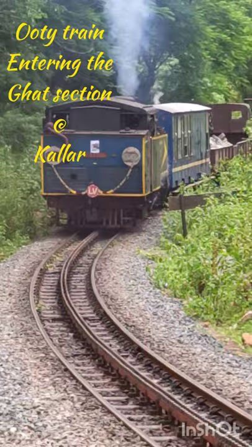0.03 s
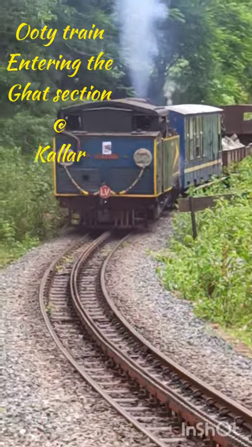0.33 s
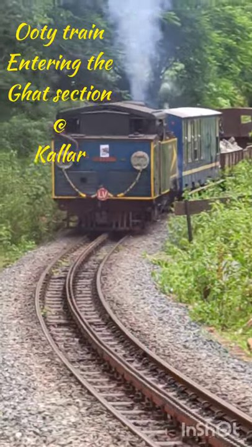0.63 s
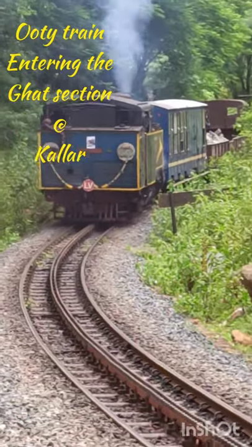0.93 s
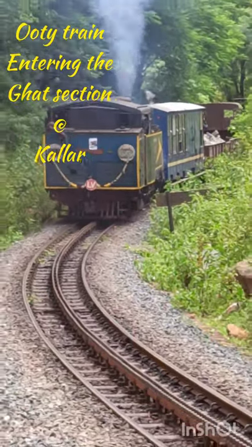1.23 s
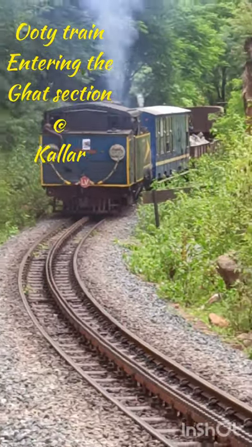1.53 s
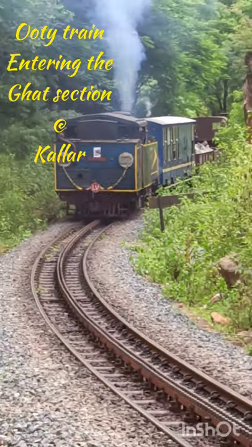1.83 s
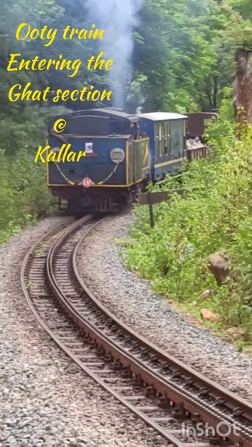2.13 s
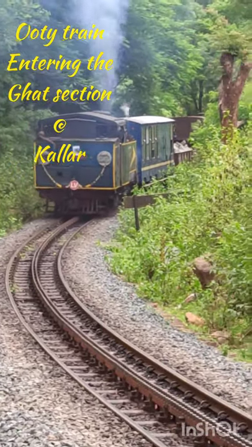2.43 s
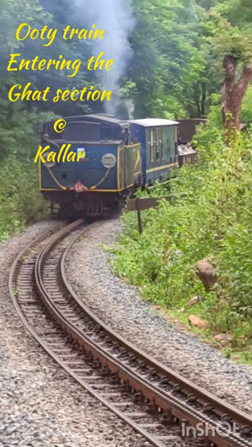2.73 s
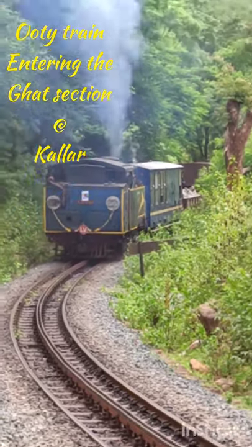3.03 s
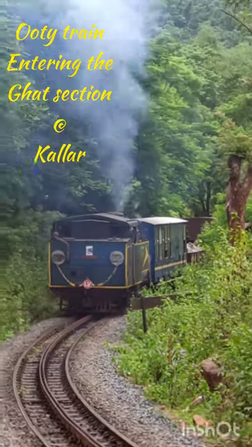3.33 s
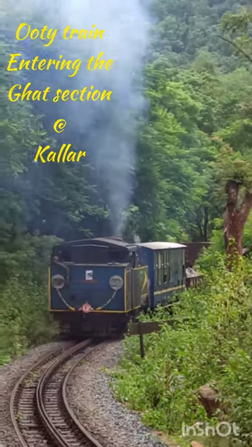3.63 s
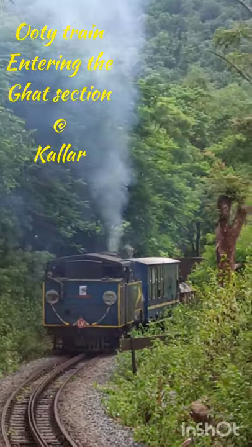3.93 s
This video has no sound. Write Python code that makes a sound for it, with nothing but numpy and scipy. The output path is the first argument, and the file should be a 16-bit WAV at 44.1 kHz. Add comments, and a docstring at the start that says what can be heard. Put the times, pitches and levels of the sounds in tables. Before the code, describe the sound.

A small steam locomotive chuffs through a forest, some way off. Rumbling wheels and leaking steam come in first, then quick, uneven chuffs and hissing jets with a few thin squeaks. The chuffs are strongest in the second half.

```python
"""A small steam locomotive works a train along a curved track in a forest, some way off.
First the engine's rumble, the rush of wheels on rails and a steady leak of steam fade in quickly.
From 0.3 s the chimney barks about six times a second, unevenly, and steam jets hiss from the cylinders
in a rhythm of their own. The trees give every blast a short tail; the running gear squeaks now and then.
The strongest barks come in the second half, and the engine is still working when the sound ends at 4 s."""
import sys
import numpy as np
from scipy import signal
from scipy.fft import rfft, irfft
from scipy.io import wavfile

SR = 44100
rng = np.random.default_rng(int(sys.argv[2]) if len(sys.argv) > 2 else 0)


def dump_mix(stems):
    """Bounce the given channels to the path in sys.argv[1] as a 16-bit WAV at rate SR."""
    frames = np.atleast_2d(stems).T  # one column per channel
    limited = np.clip(frames, -1, 1)  # hard clip at full scale
    pcm = np.round(limited * 32767).astype(np.int16)
    wavfile.write(sys.argv[1], SR, pcm)


N = 176400
TIME = np.arange(N) / SR


def chimney():
    """Each beat of used steam is a bark with a hollow pitch of its own, a low puff and a thump of air."""
    # (start [s], length [s], bark [dB], puff [dB], thump [dB], bark pitch [Hz], boost at that pitch [dB])
    beats = [(0.34, 0.035, -35.5, -44, -33.5, 600, 2), (0.420, 0.043, -36, -33.5, -32, 440, 5),
             (0.632, 0.07, -30.7, -31, -30, 530, 6), (0.790, 0.081, -28, -26.5, -31.5, 830, 5),
             (0.967, .065, -38, -35, -29.5, 660, 4), (1.102, 0.064, -35, -37, -34, 480, 0),
             (1.302, 0.05, -30.5, -28.3, -33.5, 490, 7), (1.474, .072, -39, -24.5, -28.3, 450, -2),
             (1.652, 0.041, -40, -48, -31.5, 580, 3), (1.803, 0.03, -33, -42, -47, 584, 14),
             (1.984, 0.08, -28.5, -41, -37, 530, 4), (2.073, .04, -31, -43, -44, 920, 5),
             (2.18, .068, -28.5, -31, -26, 580, 7), (2.334, 0.039, -37, -38, -30.5, 900, 10),
             (2.486, 0.069, -30.5, -34, -43, 400, 6), (2.689, 0.052, -23.2, -30, -39, 527, 11.5),
             (2.862, 0.04, -22.5, -31, -32, 542, 11.5), (2.998, 0.018, -49, -45, -48, 600, -3),
             (3.192, 0.036, -29.5, -38, -31.5, 520, 4), (3.373, 0.062, -27, -36, -37, 560, 3),
             (3.568, 0.047, -22.5, -27.5, -40, 535, 8), (3.7, 0.054, -29.5, -38.5, -30, 624, 8),
             (3.896, 0.061, -34, -43, -33, 560, 3)]
    # tone colours of the three parts: (frequency [Hz], level [dB])
    bark_colour = [(150, -28), (300, -7), (410, -2), (520, -1), (610, -2), (690, -5), (850, -3),
                   (1200, -15), (3000, -68)]
    puff_colour = [(70, -32), (120, -14), (165, -1.5), (225, -2), (265, -0.5), (340, -2.5), (500, -11.5),
                   (1000, -58)]
    thump_colour = [(30, -44), (58, -34), (78, -3), (100, 3.5), (135, -6.5), (200, -18), (400, -64)]
    exhaust = turbulence(bark_colour, flutter_db=0.5, flutter_rate=41)
    barks, puffs, thumps = np.zeros((2, N)), [], []
    for start, length, bark_db, puff_db, thump_db, pitch_hz, hollow_db in beats:
        hollow = unit_level(resonate(exhaust, pitch_hz, width_hz=200, db=hollow_db))
        barks += hollow * bursts([(start, length, bark_db)],
                                 attack_s=0.025, release_s=0.026, tail_db=-10, tail_s=0.095)
        puffs.append((start, length, puff_db))
        thumps.append((start, length, thump_db))
    puff = turbulence(puff_colour, flutter_db=0.4, flutter_rate=40)
    puff *= bursts(puffs, attack_s=0.026, release_s=0.044, tail_db=-6.5, tail_s=0.082)
    thump = turbulence(thump_colour, flutter_db=0, flutter_rate=20)
    thump *= bursts(thumps, attack_s=0.028, release_s=0.016, tail_db=-10.5, tail_s=0.15)
    return barks + puff + thump


def steam_jets():
    """Each jet starts sharply, a rush with a bright hiss on top, and rings in the pipe that it leaves."""
    # jets from the cylinders: (start [s], length [s], rush [dB], hiss [dB])
    jets = [(0.299, 0.036, -23, -27), (0.426, 0.032, -29, -50), (0.506, 0.064, -30.5, -38),
            (0.641, 0.027, -26, -28.5), (0.815, 0.075, -26.5, -35), (0.961, 0.049, -27, -31),
            (1.167, 0.072, -32.5, -39.5), (1.322, 0.028, -28, -30), (1.396, 0.02, -28, -50),
            (1.54, 0.091, -29, -38), (1.829, 0.03, -26, -29.5), (1.99, 0.066, -28.5, -36.5),
            (2.077, 0.041, -27, -28), (2.204, 0.084, -28, -33), (2.338, 0.025, -23.2, -26.8),
            (2.511, 0.064, -29.5, -34), (2.645, 0.084, -34, -34), (2.887, 0.099, -30.5, -37.5),
            (3.169, 0.041, -27.5, -29), (3.345, 0.072, -32, -36), (3.447, 0.038, -23.5, -29),
            (3.581, 0.084, -30.5, -32), (3.705, 0.025, -24, -26), (3.89, 0.067, -30.5, -35)]
    # tone colours of the two parts: (frequency [Hz], level [dB])
    rush_colour = [(300, -13), (650, -4.5), (950, 5), (1400, 1.5), (2000, -9.5), (2700, -11.5), (4500, -40),
                   (9000, -62)]
    hiss_colour = [(900, -26), (2000, 2), (2800, 4.5), (4300, 2), (5300, -6.5), (6600, -4), (8400, -11),
                   (8800, -27.5), (11200, -49), (11800, -19.5), (15500, -25)]
    # pitches that the steam pipe boosts or weakens: (frequency [Hz], width [Hz], boost [dB])
    pipe_resonances = [(1220, 50, 3.5), (1600, 60, 2), (1760, 110, -3), (1880, 45, 4.5), (2260, 65, 4.5),
                       (2500, 110, -1.5), (2790, 78, 2), (3050, 120, -2), (3290, 69, 3), (3690, 70, 2.5),
                       (3970, 70, 2.5), (5450, 270, -0.5), (6550, 110, 3), (7600, 83, 7.5)]
    rushes = [(start, length, db) for start, length, db, _ in jets]
    hisses = [(start, length, db) for start, length, _, db in jets]
    rush = turbulence(rush_colour, flutter_db=0.73, flutter_rate=70)
    rush *= bursts(rushes, attack_s=0.025, release_s=0.036, tail_db=-6.5, tail_s=0.11)
    hiss = turbulence(hiss_colour, flutter_db=1.2, flutter_rate=83)
    hiss *= bursts(hisses, attack_s=0.02, release_s=0.027, tail_db=-3, tail_s=0.096)
    steam = rush + hiss
    for hz, width_hz, db in pipe_resonances:
        steam = resonate(steam, hz, width_hz, db)
    return steam * from_db(-0.57)


def rolling():
    """The engine rumbles and the wheels rush on the rails."""
    # tone colour, mostly bass: (frequency [Hz], level [dB])
    rolling_colour = [(20, -43), (40, -34.5), (60, -20), (78, -2), (100, 1.5), (150, -0.5), (220, -6),
                      (320, -7), (420, -5.5), (620, -5.5), (760, -9), (1000, -5), (1400, -10.5),
                      (2100, -19), (3500, -29.5), (12000, -66)]
    return from_db(-29) * turbulence(rolling_colour, flutter_db=1.12, flutter_rate=10)


def steam_leak():
    """Steam keeps escaping between the jets."""
    # how loud the leak is: (time [s], level [dB])
    leak_levels = [(.1, -37), (.6, -36), (1.0, -36.5), (1.35, -38.5), (1.55, -40), (1.78, -44), (2.0, -37),
                   (2.4, -37.5), (2.8, -42.5), (3.14, -46), (3.4, -40.5), (4.0, -42)]
    # its tone colour: (frequency [Hz], level [dB])
    leak_colour = [(900, -21), (2000, 5.5), (2800, -0.5), (4300, 2), (5300, -4.5), (6600, -1.5),
                   (8400, -12.5), (8800, -23.5), (11200, -44), (11800, -19.5), (15500, -22)]
    return from_db(over_time(leak_levels)) * turbulence(leak_colour, flutter_db=1.87, flutter_rate=13)


def squeaks():
    """The running gear (wheels and rods) gives thin squeals that ring on for a moment."""
    # (start [s], length [s], pitch [Hz], width [Hz], level [dB])
    squeals = [(0.318, 0.041, 1498, 16, -35), (0.308, .035, 1960, 26, -38), (0.348, .07, 3780, 25, -45),
               (.648, 0.026, 3990, 31, -40.5), (.655, .035, 4680, 25, -46), (.66, .03, 12550, 140, -57),
               (1.28, .014, 12550, 300, -62), (1.835, 0.025, 1510, 35, -35), (2.05, .03, 12550, 150, -62),
               (2.691, .025, 12500, 65, -51), (3.175, 0.043, 1520, 60, -38),
               (3.188, 0.086, 3770, 70, -44.5), (3.455, .02, 12600, 92, -56), (3.896, 0.095, 999, 25, -37)]
    out = np.zeros(N)
    for start, length, hz, width_hz, db in squeals:
        # the wave slips at random: the greater the width, the rougher the tone
        wander = np.cumsum(rng.standard_normal(N)) * np.sqrt(2 * np.pi * width_hz / SR)
        tone = np.sqrt(2) * np.sin(2 * np.pi * hz * TIME + wander)
        out += tone * bursts([(start, length, db)],
                             attack_s=0.42 * length, release_s=0.011, tail_db=-14, tail_s=0.05)
    return out


def engine_body(left, right):
    """The chimney, boiler and frames boost some pitches and weaken others."""
    # (frequency [Hz], width [Hz], left boost [dB], right boost [dB])
    body_resonances = [(95.4, 5.1, 3.5, 4), (198, 16, 0.5, 2.5), (236, 37, -3, -6), (261.4, 9.5, 6.5, 5.5),
                       (285, 14.6, 3, 3.5), (322, 24, -8.5, -10.5), (410, 10, 2.5, 0.5),
                       (548, 8, -2.5, 2.5), (585.6, 18.5, 3, 7.5), (664, 33, 0, 8.5), (728, 90, -3, 1),
                       (806, 69, 2, -4), (927, 29, 0.5, 1.5), (1009, 25, 3, 6.5), (1092, 127, -9, -2.5),
                       (1290, 81, 0, -2.5), (1307, 90, -0.5, -6), (1483, 65, -5.5, 7.5),
                       (1965, 100, -5, 4.5), (2560, 170, -7, -0.5), (2854, 74, 0.5, 0), (3030, 80, -3, -6),
                       (3230, 120, 1, 0.5), (3430, 170, -7.5, -6), (3720, 90, 2, 5.5), (3905, 98, 4, -4),
                       (4160, 110, 2.5, 6), (4430, 160, -0.5, -3.5), (4683, 71, 4, 9.5),
                       (4850, 210, -3, -1), (5870, 440, -2, -4), (6360, 230, 5, 1.5), (6835, 73, 6, 7.5),
                       (7380, 97, 4.5, 2.5)]
    for hz, width_hz, left_db, right_db in body_resonances:
        left = resonate(left, hz, width_hz, left_db)
        right = resonate(right, hz, width_hz, right_db)
    return np.array([left, right])


def bursts(events, attack_s, release_s, tail_db, tail_s):
    """Loudness curve of (start [s], length [s], level [dB]) events: each rises, holds and dies away."""
    tail_share = from_db(tail_db) ** 2
    power = np.zeros(N)
    for start, length, db in events:
        age = np.maximum(TIME - start, 0)
        since_end = np.maximum(age - length, 0)
        rise = np.minimum(age / attack_s, 1) ** 2
        release = (1 - tail_share) * np.exp(-2 * since_end / release_s)
        tail = tail_share * np.exp(-2 * since_end / tail_s)  # for a blast, the echo from the trees
        power += from_db(db) ** 2 * rise * (release + tail)
    return np.sqrt(power)


def turbulence(colour, flutter_db, flutter_rate):
    """Fluttering stereo noise, alike on both sides in the bass and spread wide in the treble."""
    # how alike the two sides are: (frequency [Hz], likeness [about 1 = the same, 0 = unrelated])
    side_likeness = [(30, .97), (80, 1), (160, 1.05), (300, 0.92), (500, 1), (750, 0.9), (1200, 0.63),
                     (2000, 0.3), (4000, 0.2668), (15000, 0)]
    # which side is louder: (frequency [Hz], left minus right [dB])
    side_balance = [(60, 1.2), (150, -1.7), (300, 0), (600, 1), (850, 1.5), (1150, -2.5), (1800, -5.5),
                    (2600, -3), (3800, 3), (5000, 0.5), (7000, 3), (8300, 10), (9500, -11), (14000, 0.5)]
    right_lag_s = 0.00008
    hz = np.arange(N // 2 + 1) * SR / N
    middle, side = rfft(rng.standard_normal((2, N))) * from_db(at_hz(colour, hz))
    alike = np.clip(at_hz(side_likeness, hz), -0.5, 0.998)
    signs = np.array([[1], [-1]])  # left, right
    pair = middle + signs * side * np.sqrt((1 - alike) / (1 + alike))
    pair *= from_db(signs * at_hz(side_balance, hz) / 2)
    pair[1] *= np.exp(-2j * np.pi * hz * right_lag_s)
    steady = irfft(pair, N) / np.std(irfft(middle, N))
    return steady * from_db(flutter_db * drift(flutter_rate))


def drift(rate):
    """Smooth random wandering of about 1 either way; a higher rate wanders faster."""
    step, warm_up = 40, 2000  # one point every 40 samples; the first 2000 points are dropped
    memory = np.exp(-2 * np.pi * rate * step / SR)
    jitter = rng.standard_normal(N // step + warm_up + 2)
    slow = signal.lfilter([1], [1, -2 * memory, memory ** 2], jitter)[warm_up:]
    return np.interp(np.arange(N) / step, np.arange(len(slow)), unit_level(slow))


def resonate(x, hz, width_hz, db):
    """Boost a band of pitches around hz, or weaken it if db is negative."""
    angle, gain = 2 * np.pi * hz / SR, from_db(db / 2)
    band = np.sin(angle) * width_hz / (2 * hz)
    forward = [1 + band * gain, -2 * np.cos(angle), 1 - band * gain]
    feedback = [1 + band / gain, -2 * np.cos(angle), 1 - band / gain]
    return signal.lfilter(forward, feedback, x)


def from_db(db):
    """Turn decibels into a factor to multiply by."""
    return 10 ** (np.asarray(db) / 20)


def unit_level(x):
    """Scale a signal to an average (rms) level of 1."""
    return x / np.sqrt(np.mean(x ** 2) + 1e-20)


def over_time(points):
    """Join (time [s], value) points with straight lines."""
    return np.interp(TIME, *np.transpose(points))


def at_hz(points, hz):
    """Read between (frequency [Hz], value) points, with every octave equally wide."""
    frequencies, values = np.transpose(points)
    return np.interp(np.log(hz + 1e-6), np.log(frequencies), values)


def scene():
    """Steam and rumble, coloured by the engine's body, with the squeaks on top."""
    left, right = chimney() + steam_jets() + steam_leak() + rolling()
    return engine_body(left, right) * from_db(-5) + squeaks()


def record(dry):
    """The sound fades in quickly, and the very highest treble is cut."""
    # the opening fade: (time [s], level [dB])
    opening_levels = [(.075, -61), (.083, -16), (.125, -10.5), (.17, 3), (.2, 3.5)]
    treble_cut = signal.cheby2(12, 70, 16200, fs=SR, output="sos")  # 70 dB down from 16200 Hz up
    return signal.sosfilt(treble_cut, dry * from_db(over_time(opening_levels)))


dry = scene()
out = record(dry)
dump_mix(out)
```